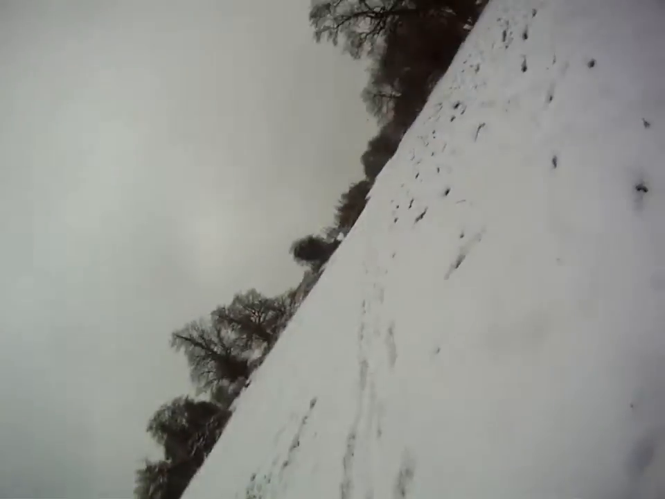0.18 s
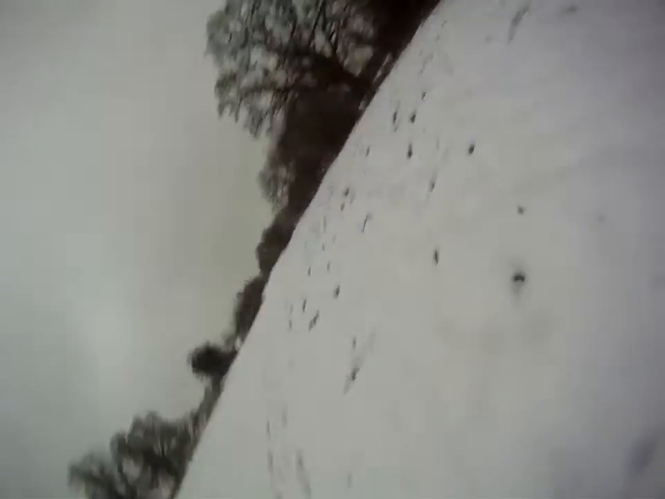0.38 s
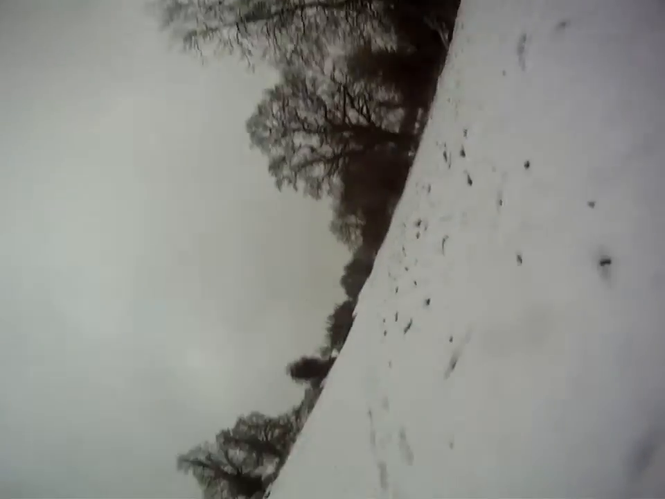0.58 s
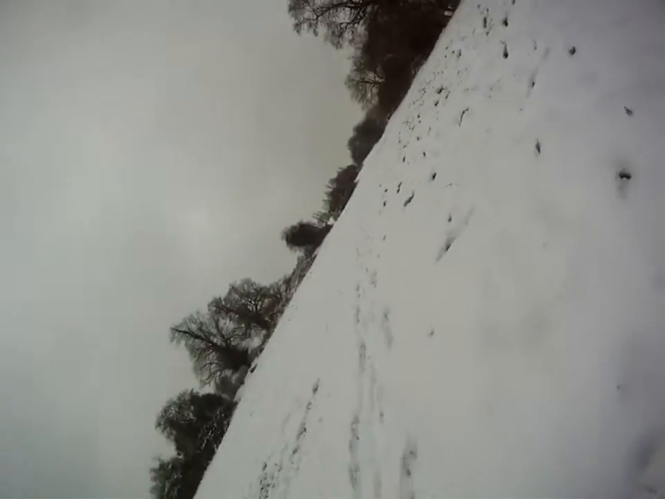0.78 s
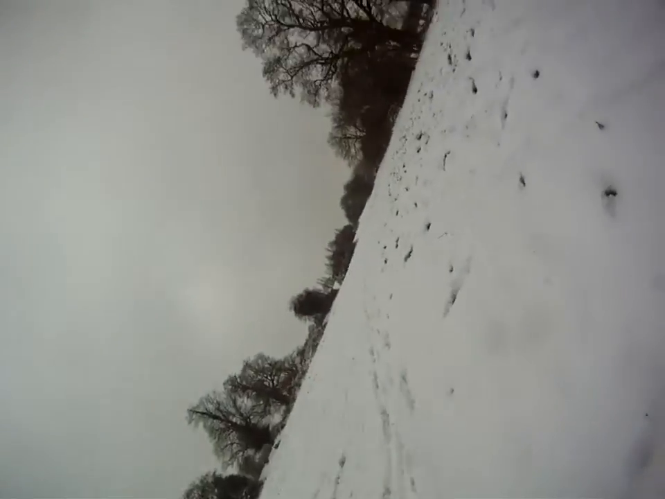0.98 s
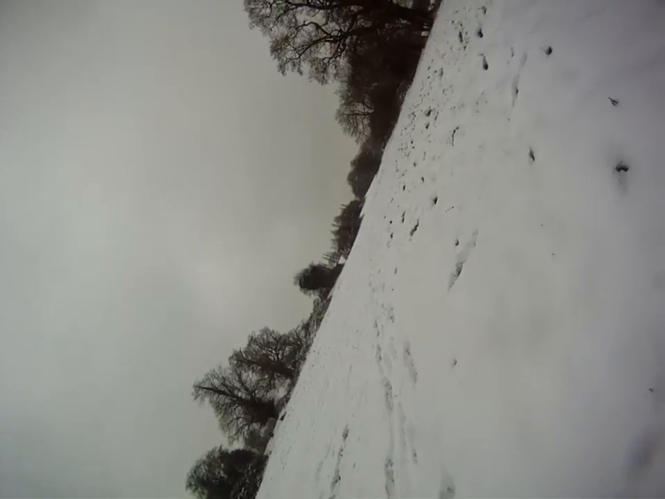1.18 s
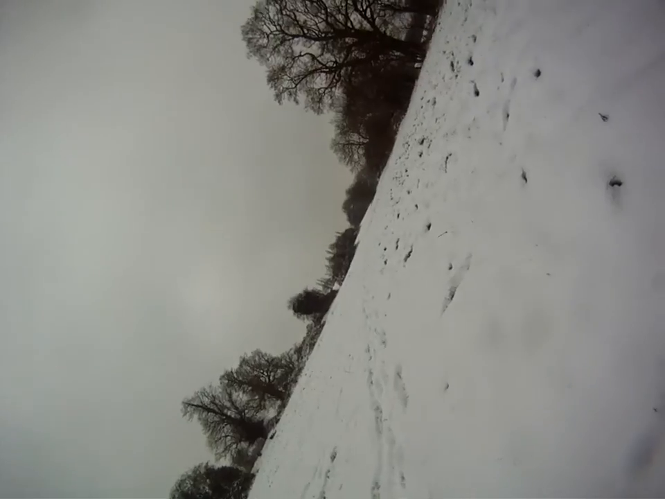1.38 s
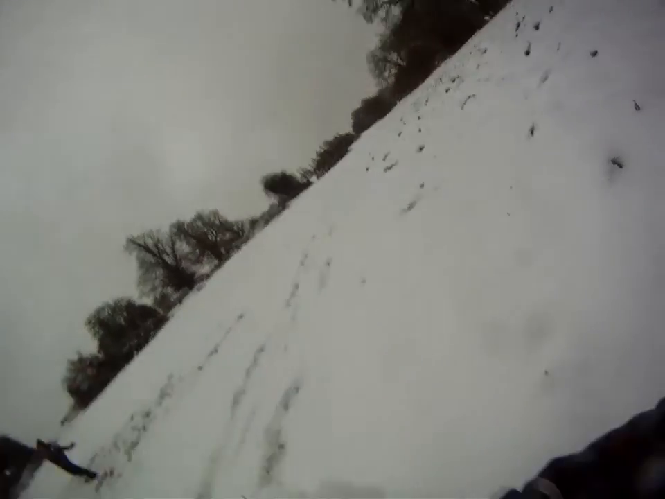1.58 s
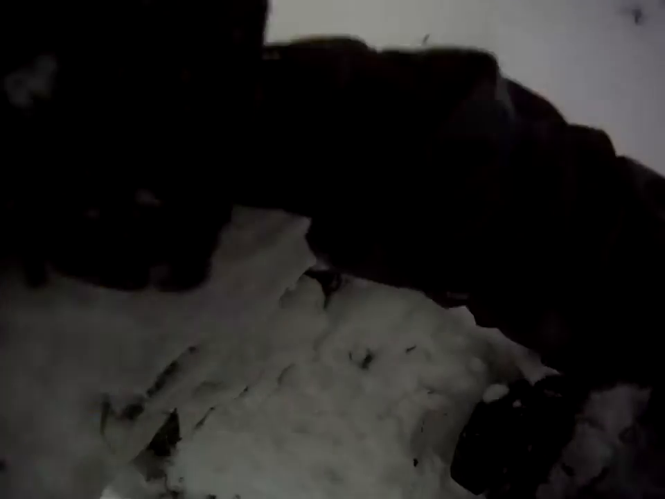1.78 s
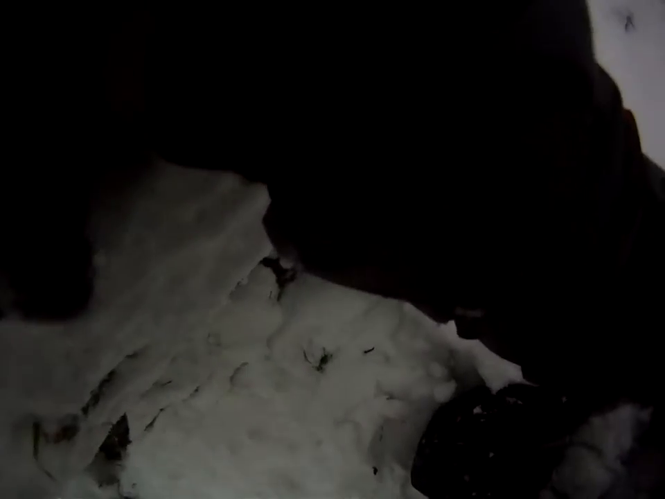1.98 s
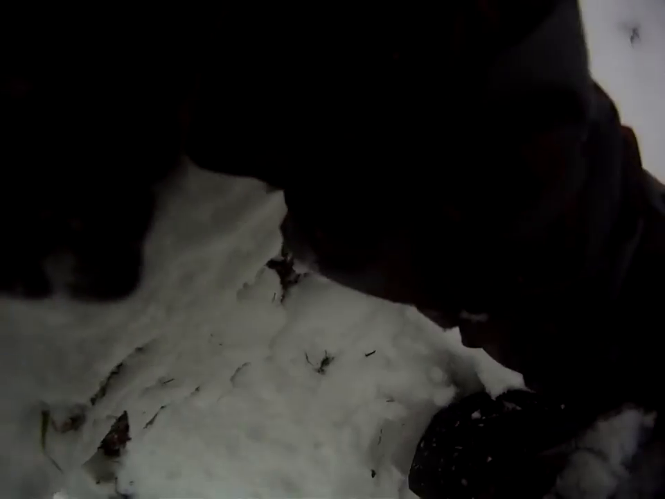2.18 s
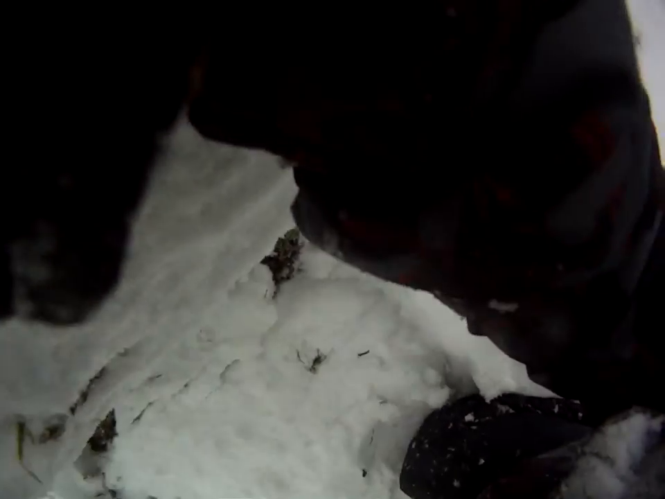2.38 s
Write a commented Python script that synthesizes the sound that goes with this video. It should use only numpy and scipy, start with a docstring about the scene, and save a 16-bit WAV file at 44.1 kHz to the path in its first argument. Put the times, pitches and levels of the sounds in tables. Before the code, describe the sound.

Gloved hands crunch and scrape snow against a small camera, with sharp cracks and dull thumps.

```python
"""In the snow, at touching distance: gloved hands handle a small camera, heard through its own microphone.
From the start, snow grains and fabric crackle on its plastic shell, which rings in short resonances over a rumble.
Single cracks and icy ticks soon join, as filtered clicks and grit, and pushes on the shell give low thumps.
Near the end a low creak of resonant noise dies away under two short gritty whistles of squeezed snow.
Still air lies beneath. The recorder holds each of 12000 samples a second, mirroring every ring around 12 kHz."""
import sys
import numpy as np
from scipy import signal
from scipy.fft import rfft, irfft
from scipy.io import wavfile
from scipy.ndimage import uniform_filter1d

SR = 44100
rng = np.random.default_rng(int(sys.argv[2]) if len(sys.argv) > 2 else 0)


def dump_mix(stems):
    """Bounce the given channels to the path in sys.argv[1] as a 16-bit WAV at rate SR."""
    frames = np.atleast_2d(stems).T  # one column per channel
    limited = np.clip(frames, -1, 1)  # hard clip at full scale
    pcm = np.round(limited * 32767).astype(np.int16)
    wavfile.write(sys.argv[1], SR, pcm)


def volts_from_db(level):
    """Convert decibel levels to linear amplitude ratios."""
    exponent = np.asarray(level, float) / 20
    return 10 ** exponent


N = 105840  # length [samples]


def evened(x):
    """Scales a signal to an rms of one."""
    return x / np.sqrt(np.mean(x ** 2) + 1e-20)


def curve(table, column):
    """One column of a timed table, drawn as straight lines through every sample."""
    return np.interp(np.arange(N) / SR, *np.transpose(table)[[0, column]])


def shaped(points):
    """Noise of unit rms with a given spectrum, interpolated over log frequency."""
    f, db = np.transpose(points)
    hz = np.fft.rfftfreq(N, 1 / SR)
    spectrum_db = np.interp(np.log(hz + 1), np.log(f + 1), db)
    return evened(irfft(rfft(rng.standard_normal(N)) * volts_from_db(spectrum_db), N))


def ring(x, rings):
    """Drives a sum of steep resonances: each is a double pole, with its sign alternating."""
    out = 0
    for k, (hz, width, db) in enumerate(rings):
        pole = np.exp((2j * np.pi * hz - np.pi * width * 1.5) / SR)
        resonance = signal.lfilter([1], [1, -2 * pole, pole ** 2], x).real
        out = out + (-1) ** k * volts_from_db(db) * (1 - abs(pole)) ** 2 * resonance
    return out


def grains():
    """Sparse snow-grain clicks at random times, a few of them large, at unit rms."""
    grains_per_s, spread_db = 3400, 2
    size = volts_from_db(spread_db * np.minimum(rng.exponential(1, N), 3.3)) * rng.standard_normal(N)
    return evened(size * (rng.random(N) < grains_per_s / SR))


def clumps():
    """Envelope of grain clumps that start sharply and die away."""
    clumps_per_s, fall_s, spread_db = 170, 0.0045, 5
    between = 0.3  # what remains between clumps, against their rms
    size = volts_from_db(spread_db * np.minimum(rng.exponential(1, N), 2))
    starts = size * (rng.random(N) < clumps_per_s / SR)
    envelope = between + evened(signal.lfilter([1], [1, -np.exp(-1 / (fall_s * SR))], starts))
    # level out the slow swells: the rubbing curve sets those
    return envelope / np.sqrt(uniform_filter1d(envelope ** 2, size=SR // 45))


def wandering(drive, rings):
    """The grip changes: from moment to moment the shell's rings sit a little lower or higher."""
    grip_s, shift = 0.012, 0.027  # how long the rings stay put; share by which they move
    grip = evened(uniform_filter1d(rng.standard_normal(N), size=round(grip_s * SR)))
    lower = 0.5 + 0.5 * np.tanh(grip)
    out = 0
    for part, factor in ((lower, 1 - shift), (1 - lower, 1 + shift)):
        moved = [(hz * factor, width, db) for hz, width, db in rings]
        out = out + ring(drive * np.sqrt(part), moved)
    return out


# Resonances of the plastic shell close to the microphone, in five families:
# (frequency [Hz], width [Hz], level within the family [dB])
MAIN_RINGS = [(1684, 544, -1), (2106, 240, 10), (2690, 320, -11)]
LOW_RINGS = [(1225, 221, 1.5)]
HIGH_RINGS = [(2770, 830, 6.6), (3612, 203, 20.1)]
FIZZ_RINGS = [(4320, 220, 0.24), (5070, 830, -1.2)]
DEEP_RINGS = [(396, 540, -3), (828, 135, 2)]
FAMILIES = [MAIN_RINGS, LOW_RINGS, HIGH_RINGS, FIZZ_RINGS, DEEP_RINGS]
# Rubbing of snow and fabric on the shell, level of the main rings: (time [s], level [dB])
RUBBING = [(0, -61.5), (.187, -50.5), (.196, -37.5), (.234, -36.5), (.241, -30), (.267, -39), (.275, -43.5),
           (.32, -46.5), (.335, -36), (.42, -58.5), (.485, -43), (.501, -25), (.512, -26), (.517, -29),
           (.527, -28.5), (.538, -28.5), (.549, -20), (.558, -30.5), (.59, -36), (.605, -53), (.64, -50.5),
           (.668, -37.5), (.738, -37.5), (.748, -50.5), (.88, -53.5), (.92, -62), (.96, -53), (1.02, -52.5),
           (1.027, -42), (1.10, -41), (1.115, -61), (1.20, -49.5), (1.24, -65), (1.28, -64), (1.31, -44),
           (1.35, -63), (1.45, -69.5), (1.54, -60), (1.58, -45), (1.651, -48), (1.655, -36.5), (1.695, -44),
           (1.71, -37.5), (1.80, -41.5), (1.925, -49.5), (1.95, -47), (2.03, -49.5), (2.11, -47.5),
           (2.20, -52.5), (2.22, -67), (2.30, -70.5), (2.35, -46.5), (2.4, -44.5)]
# Colour of the rubbing, each family against the main rings:
# (time [s], low rings [dB], high rings [dB], fizz [dB], deep rings [dB])
RUBBING_COLOUR = [(0, -12, -7, -18, -9.5), (.2, -4.5, -4, -16.5, -9.5), (.34, -7.5, -8.5, -29, -17.5),
                  (.53, -3.5, -5, -17.5, -9.5), (.68, -6.5, -5, -30, -13), (1.07, -3.5, -5, -17, -7.5),
                  (1.6, -3.5, -8, -26, -10.5), (1.73, -4.5, -3.5, -16.5, -12),
                  (1.85, -10.5, -7.5, -23, -22), (2.1, -6, -9, -21, -23.5), (2.4, -9.5, -5.5, -12, -20)]


def rubbing():
    """Clumped grains drive each family of shell rings, partly with the same grains."""
    shared = 0.65  # amplitude share of the common grains
    envelope, common, out = clumps(), grains(), 0
    for k, rings in enumerate(FAMILIES):
        drive = envelope * (shared * common + np.sqrt(1 - shared ** 2) * grains())
        family_db = curve(RUBBING_COLOUR, k) if k else 0
        out = out + evened(wandering(drive, rings)) * volts_from_db(family_db)
    return out * volts_from_db(curve(RUBBING, column=1))


def grit_burst():
    """A 20 ms stretch of noise that rises and falls within about a millisecond each."""
    rise_s, fall_s = 0.00063, 0.00087
    t = np.arange(900) / SR
    return rng.standard_normal(len(t)) * (1 - np.exp(-t / rise_s)) * np.exp(-t / fall_s)


# Single loud cracks on the shell:
# (time [s], peak of the main rings [dB], peak of the high rings against it [dB])
CRACKS = [(0.0817, -54.5, 16.5), (0.2414, -23.5, -34), (0.255, -22.5, -26), (0.4369, -25.5, -10),
          (0.6696, -23.5, -27), (0.7006, -26, -18), (0.745, -28.5, -7), (.759, -40.5, 6.5),
          (0.7871, -36, -15), (0.8485, -37.5, 0), (0.9303, -37.5, -22), (0.9727, -29.5, -28),
          (1.0039, -36.5, -5), (1.0436, -22.5, -31), (1.1237, -38, 6), (1.316, -36.5, -14),
          (1.332, -37.5, -20), (1.4776, -41, -35), (1.5716, -31.5, -13), (1.6162, -26, -18),
          (1.68, -23, -4), (1.738, -40, 9), (1.864, -24, -6), (1.935, -30, -29), (1.9382, -24.5, -28),
          (1.95, -23, -16), (1.9524, -26, -12), (1.9654, -28.5, -34), (1.9772, -33, -18),
          (2.0168, -25, -13.5), (2.2827, -44.5, -31), (2.3509, -28, -26), (2.3558, -28, -21)]


def cracks():
    """Each crack is a click with a short burst of grit, ringing all five families of the shell."""
    grit_share = 0.39  # grit against the click
    low_db, fizz_db, deep_db = -15.5, -21.5, -20.5  # peaks against the main rings
    out = np.zeros(N + 900)
    for s, db, high_db in CRACKS:
        strike = grit_share * grit_burst()
        strike[0] += 1  # the click
        sound = 0
        for rings, family_db in zip(FAMILIES, (0, low_db, high_db, fizz_db, deep_db)):
            part = ring(strike, rings)
            sound = sound + volts_from_db(family_db) * part / abs(part).max()
        out[round(s * SR):][:len(strike)] += volts_from_db(db) * sound
    return out[:N]


# Bright ticks of ice against the shell: (time [s], peak level [dB])
TICKS = [(0.226, -35), (0.32, -38.5), (1.0046, -42), (1.077, -38), (1.6863, -37.5) ]


def ticks():
    """A burst of grit excites the fizz rings alone."""
    out = np.zeros(N + 900)
    for s, db in TICKS:
        sound = ring(grit_burst(), FIZZ_RINGS)
        out[round(s * SR):][:len(sound)] += volts_from_db(db) * sound / abs(sound).max()
    return out[:N]


# Pushes on the shell around the microphone: (time [s], size before the swing back [dB], length [s])
THUMPS = [(0.187, -31, 0.028), (0.307, -30.5, 0.03), (0.4705, -21, 0.0085), (0.489, -25.5, 0.0046),
          (0.528, -20, 0.0036), (0.5519, -18.5, 0.006), (0.558, -15, 0.013), (0.598, -33.5, 0.0137),
          (0.677, -32, 0.00335), (1.083, -26.5, 0.0017), (1.314, -39.5, .005), (1.762, -29, 0.0036),
          (1.774, -24.5, 0.0073), (1.815, -34, 0.03), (1.938, -34.5, 0.0061)]


def thumps():
    """Smooth inward pushes through a resonant high-pass: the pressure swings back after each."""
    rebound_hz, rebound_q = 25.2, 0.82
    t, push = np.arange(N) / SR, 0
    for s, db, length in THUMPS:
        push = push - volts_from_db(db) * np.sin(np.pi * np.clip((t - s) / length, 0, 1)) ** 2
    w = 2 * np.pi * rebound_hz
    b, a = signal.bilinear([1, 0, 0], [1, w / rebound_q, w ** 2], SR)
    return signal.lfilter(b, a, push)


# Short whistles of squeezed snow: (time [s], frequency [Hz], level before the grit [dB])
SQUEAKS = [(1.813, 5200, -46), (1.833, 4020, -49)]


def squeak():
    """Short tones that swell and fade, roughened by slow noise."""
    length_s, grit_width_hz = 0.017, 200
    t, out = np.arange(N) / SR, 0
    grit = 0.5 + evened(ring(grains(), [(0, grit_width_hz, 0)]))
    for s, hz, db in SQUEAKS:
        swell = np.sin(np.pi * np.clip((t - s) / length_s, 0, 1))
        out = out + volts_from_db(db) * swell * np.cos(2 * np.pi * hz * t)
    return out * grit


def creak():
    """Grain noise in one low resonance, dying away after a late push."""
    start_s, start_db, t60_s = 1.772, -45, 0.29
    hz, width_hz = 255, 17
    t = np.arange(N) / SR - start_s
    decay = (t > 0) * volts_from_db(start_db - 60 * abs(t) / t60_s)
    return decay * evened(ring(grains(), [(hz, width_hz, 0)]))


# Spectrum of the rumble under the hands: (frequency [Hz], density [dB per Hz], overall level set apart)
RUMBLE = [(25, -1.5), (50, -13), (120, -11), (300, -21), (600, -28.5)]


def rumble():
    """Low noise that follows the rubbing curve, 7.5 dB beneath it."""
    return shaped(RUMBLE) * volts_from_db(curve(RUBBING, column=1) - 7.5)


# Spectrum of the still air: (frequency [Hz], density [dB per Hz], overall level set apart)
AIR = [(20, -13), (250, -20), (800, -25.5), (5900, -36.5)]


def air():
    """Steady noise of still air, at -60.5 dB rms."""
    return volts_from_db(-60.5) * shaped(AIR)


def scene():
    """Everything that reaches the one microphone, as a single channel."""
    handling = rubbing() + cracks() + ticks() + thumps() + squeak() + creak()
    return (handling + rumble() + air())[None]


def roll_off(x):
    """The treble ends steeply here."""
    return signal.sosfilt(signal.butter(12, 16470, fs=SR, output="sos"), x)


def record(dry):
    """Takes 12000 samples a second, holds each for four steps of a 48000 Hz clock, then limits the band."""
    guard = signal.firwin(6001, 5880, fs=40 * SR)  # low-pass just under half of 12 kHz
    sampled = signal.resample_poly(dry, 40, 147, axis=1, window=guard)
    held = np.repeat(sampled, 4, axis=1)  # the steps mirror every ring around 12 kHz
    back = signal.resample_poly(held, 147, 160, axis=1)[:, :N]  # 48000 Hz to SR
    band_limit = signal.firwin(191, 15300, fs=SR)[None]
    mix = signal.oaconvolve(back, band_limit, "same")
    return roll_off(mix)


dry = scene()
out = record(dry)
dump_mix(out)
```